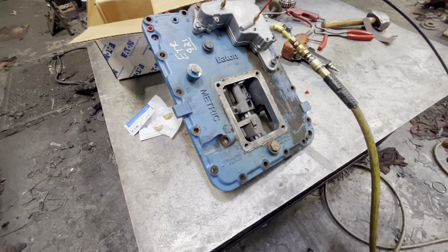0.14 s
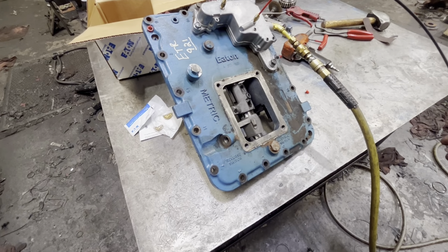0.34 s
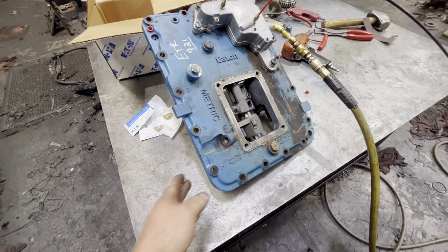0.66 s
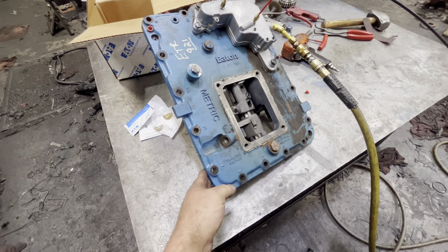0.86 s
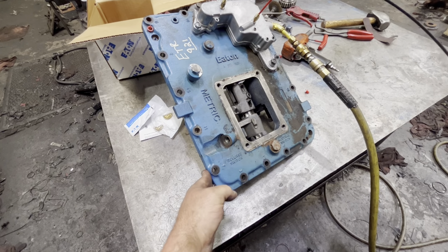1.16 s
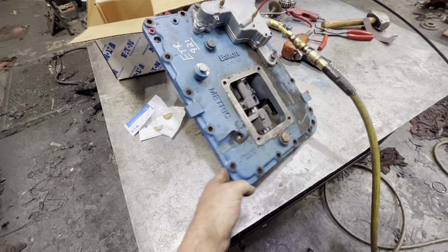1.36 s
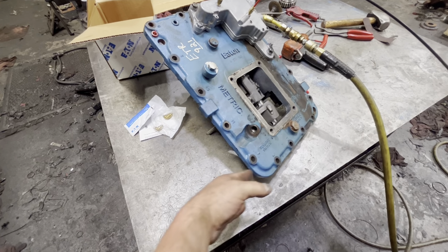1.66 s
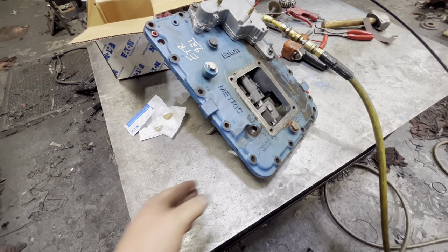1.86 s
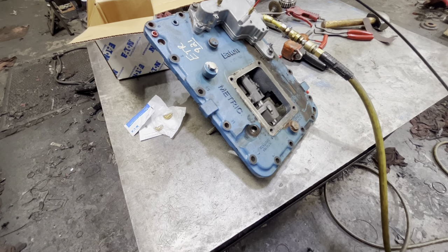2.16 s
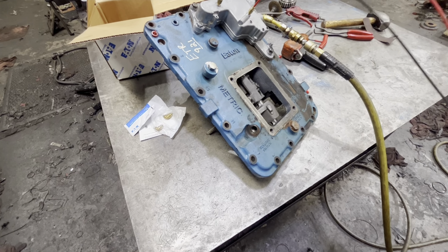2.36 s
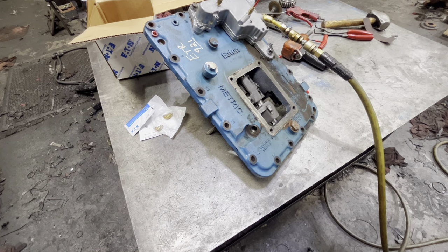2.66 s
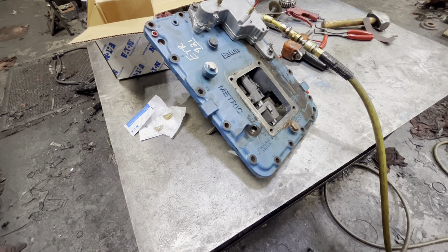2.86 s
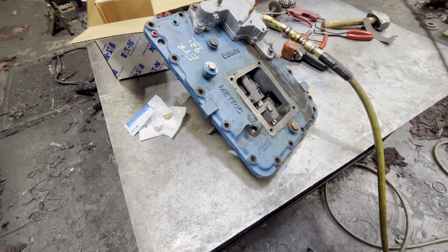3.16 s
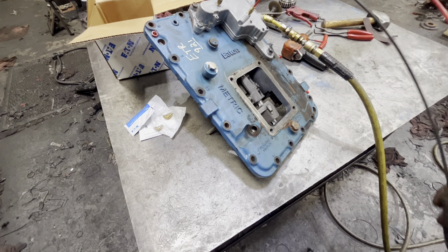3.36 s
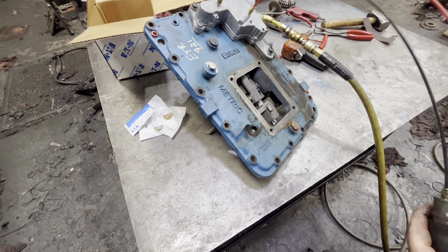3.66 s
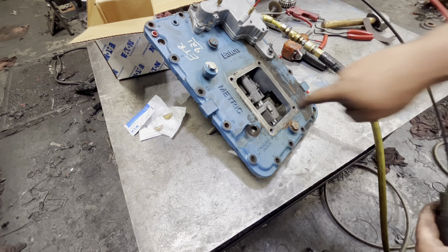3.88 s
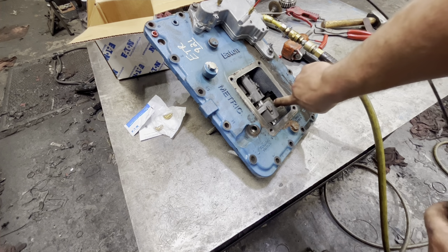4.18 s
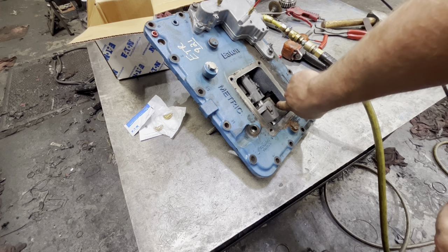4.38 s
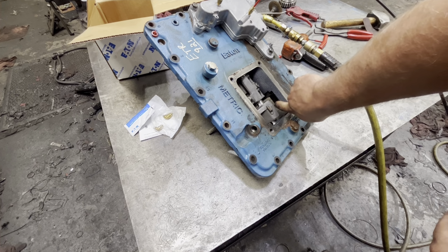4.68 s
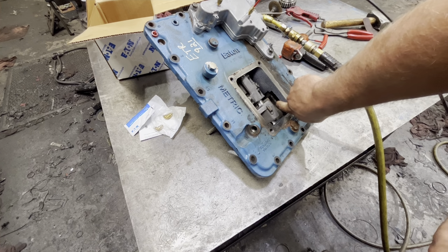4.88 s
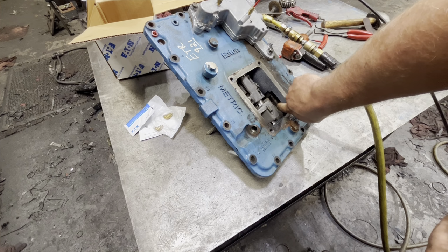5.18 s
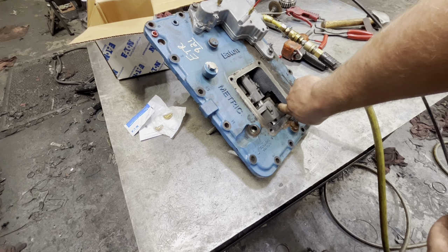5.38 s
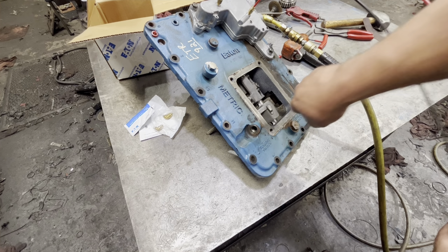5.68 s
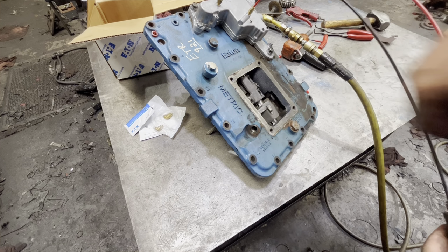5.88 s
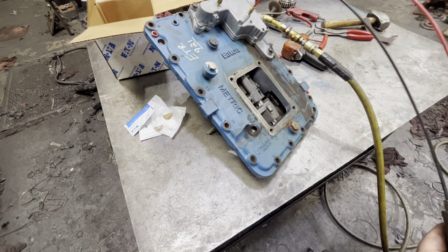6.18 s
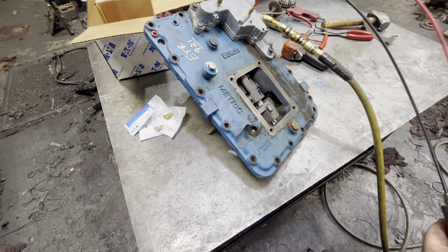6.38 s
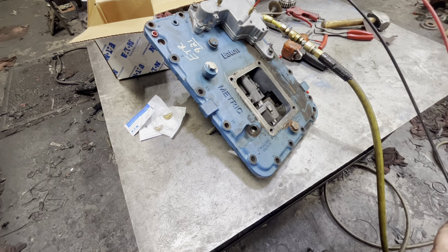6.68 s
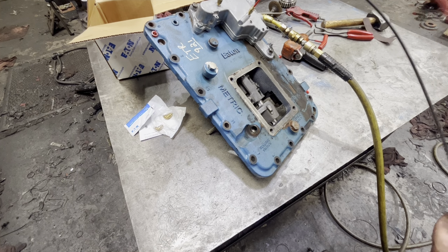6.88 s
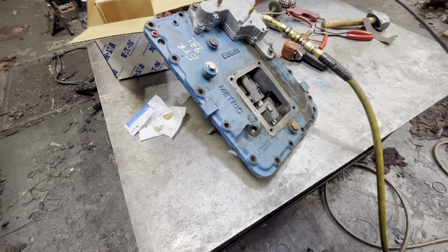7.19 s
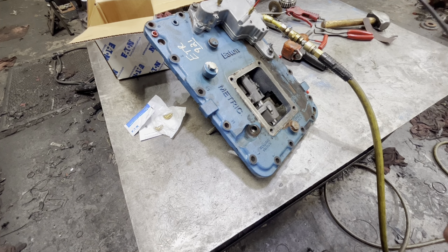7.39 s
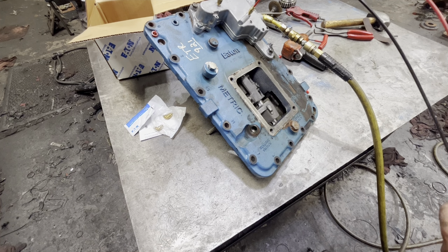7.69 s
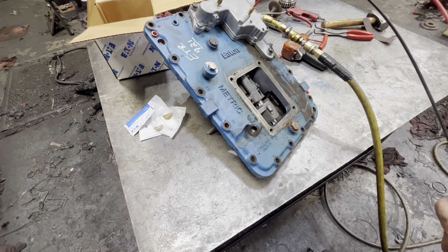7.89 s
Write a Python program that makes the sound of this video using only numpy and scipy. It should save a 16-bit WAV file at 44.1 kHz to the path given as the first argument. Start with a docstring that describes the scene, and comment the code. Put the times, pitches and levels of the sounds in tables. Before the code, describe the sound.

Compressed air hisses steadily from a metal casting on a bench; a dull scrape, small ticks, then five sharp air blasts ending in hard metallic clacks.

```python
"""An air-shifted transmission cover is tested on a workshop bench: low rumble and machine hum lie below all.
A leak, noise through cavity resonances, hisses throughout; a shove scrapes the cover round and turns it away.
The hand valve is picked up with damped ticks, and an arm reaches over the leak and throws its hiss back.
Five throws, out and back by turns: noise spits, blasts while the piston travels, and modes ring as it stops.
With the piston out, softer noise blows on until the next throw, after the last one to the end."""
import sys
import numpy as np
from scipy import signal
from scipy.io import wavfile
from scipy.ndimage import uniform_filter1d

SR = 44100
rng = np.random.default_rng(int(sys.argv[2]) if len(sys.argv) > 2 else 0)


def output_pcm(signal):
    """Save a mono or channel-first signal as 16-bit PCM at the path in sys.argv[1].

    Samples are clipped to [-1, 1] before scaling.
    """
    pcm = np.clip(np.atleast_2d(signal).T, -1, 1) * 32767
    wavfile.write(sys.argv[1], SR, np.round(pcm).astype(np.int16))


N = 354563
T = np.arange(N) / SR

# throws of the valve: (valve opens t/s, piston breaks free t/s, piston hits stop t/s, level/dB, direction)
THROWS = [(4.68, 4.7588, 4.9245, 0, "out"), (5.292, 5.3315, 5.4202, 0, "back"),
          (5.772, 5.844, 6.006, -0.2, "out"), (6.313, 6.3533, 6.4418, 0.25, "back"),
          (7.538, 7.5674, 7.7375, 0, "out")]
# lull between spit and blast, by direction: (duration/s)
LULL_S = {"out": .02, "back": .024}
# level difference of the two channels, left minus right: (f/Hz, level/dB)
CHANNEL_BALANCE = [(60, -0.5), (250, -7), (500, -1), (1400, -0.5), (2200, -6), (2850, -3), (3300, 1),
                   (4000, 5), (5300, 6), (5900, 4), (7400, -0.5), (9100, -11.5), (10000, -2.5),
                   (10800, -0.5)]
# the shove: fastest moment, speeding up, slowing down
SHOVE_S, SHOVE_RISE_S, SHOVE_FALL_S = 1.405, 0.075, 0.18


def amp(db):
    """Decibels to gain."""
    return 10 ** (np.asarray(db) / 20)


def unit(x):
    """Scales to rms 1."""
    return x / np.sqrt(np.mean(x ** 2) + 1e-20)


def read(points, hz):
    """Interpolates a table on a log-frequency axis."""
    f, value = np.transpose(points)
    return np.interp(np.log(hz + 1), np.log(f + 1), value)


def add(mix, start_s, sound):
    """Mixes a two-channel sound in at start_s."""
    part = mix[:, round(start_s * SR):][:, :sound.shape[1]]
    part += sound[:, :part.shape[1]]


def wander(t, max_hz):
    """Random slow drift of rms 1: 20 sines from max_hz / 20 to max_hz, slow ones strongest."""
    speeds_hz = max_hz * np.geomspace(1 / 20, 1, num=20)
    return unit(sum(np.sin(2 * np.pi * (f * t + rng.random())) / np.sqrt(f) for f in speeds_hz))


def gate(start_s, stop_s, rise_s, fall_s):
    """Flow builds up exponentially from start_s and dies away after stop_s."""
    build = -np.expm1(-np.maximum(T - start_s, 0) / rise_s)
    return build * np.exp(-np.maximum(T - stop_s, 0) / fall_s)


def jet(spectrum, cavities=(), ripple_db=-0.3, patchy_db=1.5):
    """Turbulent noise through cavity resonances and near reflections, in two channels; rms 1."""
    # correlation of left and right channels: (f/Hz, correlation 0-1)
    channel_correlation = [(100, 0.96), (270, 0.89), (500, 0.12), (900, 0.8), (3000, 0.4), (9000, 0.39),
                           (11500, 1), (15500, 0.46)]
    # phase by which the left channel leads the right: (f/Hz, phase/rad)
    channel_phase = [(250, 0), (900, .6), (1900, 2.1), (3300, 4.1), (5400, 4.6), (7000, 6.3), (8300, 9.2),
                     (9300, 10.2), (10300, 12.5), (13000, 12.5), (14700, 10)]
    size, hop = 1024, 256
    hz = np.fft.rfftfreq(size, 1 / SR)
    t = np.arange(N // hop + 5)[:, None] * hop / SR
    a, b, c, d, patches = rng.standard_normal((5, len(t), len(hz)))

    colour_db = read(spectrum, hz)
    for centre_hz, width_hz, db in cavities:
        # pitch and strength drift a little with the flow
        detune_hz = hz - centre_hz * (1 + 0.003 * wander(t, 1.5))
        peak_db = db + 0.6 * wander(t, 2)
        colour_db = colour_db + peak_db / (1 + (2 * detune_hz / width_hz) ** 2)
    patches = uniform_filter1d(patches, size=14, axis=0)
    patches = unit(uniform_filter1d(patches, size=8, axis=1))

    # echoes off casting and bench comb the hiss; the combs slide slowly
    delays_s = rng.uniform(0.002, 0.008, size=3)
    combs = sum(np.cos(2 * np.pi * hz * delay * (1 + 0.003 * wander(t, 0.7))) for delay in delays_s)
    ripple = ripple_db * combs * hz / (hz + 1500)

    same = np.clip(read(channel_correlation, hz), 0, 1)
    left = a + 1j * b
    right = same * left + np.sqrt(1 - same ** 2) * (c + 1j * d)
    right = right * np.exp(-1j * read(channel_phase, hz))
    lean = amp(read(CHANNEL_BALANCE, hz) / 2)
    z = np.array([left * lean, right / lean]) / np.hypot(lean, 1 / lean)
    z *= amp(colour_db + patchy_db * patches + ripple)
    noise = signal.istft(z, nperseg=size, noverlap=size - hop, time_axis=1, freq_axis=2)[1]
    return unit(noise[:, :N])


def blasts(held_db=-27, shudder_db=-25.5, flutter_db=1.0):
    """Air escapes while the piston travels, by one path out and another back; held out, it blows softly."""
    # air path, piston going out: (f/Hz, level/dB per Hz); cavities (f/Hz, width/Hz, level/dB)
    out_jet = [(500, -26), (1700, -23), (2000, -20), (6000, -11), (10000, -8), (14000, -13), (15600, -18)]
    out_cavities = [(930, 180, 6), (2170, 670, 14), (2920, 370, 6), (3440, 600, 13), (4670, 490, 5),
                    (5400, 400, 8), (5930, 660, 7), (6620, 370, 8), (9010, 470, 6), (9860, 360, 4),
                    (10330, 180, 4)]
    # air path, piston coming back: same columns
    back_jet = [(500, -22), (1700, -19), (3000, -17), (8000, -8), (11000, -9), (14500, -14), (15600, -13)]
    back_cavities = [(890, 140, 6), (2210, 160, 9), (3290, 800, 10), (4490, 120, 6), (5210, 540, 5),
                     (6660, 790, 6), (7400, 170, 8), (9770, 530, 6)]
    # cavities changed in the softer blowing: (f/Hz, width/Hz, level/dB)
    held_cavities = [(900, 300, -8), (3450, 400, -5), (5400, 500, -3), (9950, 200, 5), (12200, 1600, -3)]
    # crack of air let out by the freed piston: (f/Hz, level/dB per Hz)
    crack_jet = [(200, 0), (1500, -24), (2400, 1), (3600, 2.5), (6000, -3), (8500, -2), (15000, -19)]
    # blast and crack, by direction: (level/dB)
    blast_db = {"out": -16, "back": -17.5}
    crack_db = {"out": -13.3, "back": -12}
    out, held, back, crack = 0, 0, 0, 0
    next_throws_s = [row[0] for row in THROWS[1:]] + [N / SR]
    for (_, free_s, stop_s, db, way), shut_s in zip(THROWS, next_throws_s):
        crack = crack + amp(db + crack_db[way]) * gate(free_s, free_s + 0.0048, 0.0005, 0.0031)
        if way == "out":
            out = out + amp(db + blast_db[way]) * gate(free_s, stop_s, 0.00067, 0.013)
            held = held + amp(db + held_db) * gate(stop_s, shut_s, 0.025, 0.0074)
        else:
            back = back + amp(db + blast_db[way]) * gate(free_s, stop_s, 0.0012, 0.009)
    air = out * jet(out_jet, out_cavities, ripple_db=2.5)
    air = air + back * jet(back_jet, back_cavities, ripple_db=1.5)
    air = air + held * jet(out_jet, out_cavities + held_cavities, ripple_db=2.3)
    # the flow also shakes the casting
    shake = jet([(20, -28), (60, 22), (120, -2.5), (250, -4.5), (500, -19), (1500, -52)])
    shudder = (out + held + back) * amp(shudder_db) * shake
    return air * amp(flutter_db * wander(T, 120)) + crack * jet(crack_jet) + shudder


def spits(fizz_db=-16, rush_db=-18.5, max_fizz_s=0.026):
    """Air squeezes through the valve's narrow gap as a fizz, then a wider rush; slow throws build slowly."""
    # narrow gap, then wider gap: (f/Hz, level/dB per Hz)
    fizz_jet = [(1000, -40), (7000, -6.5), (8700, -6.5), (9800, 1), (12000, -0.5), (14000, 2), (15500, -4)]
    rush_jet = [(100, -9), (600, -21), (1500, -10), (3000, 0), (4200, 1), (6000, -0.5), (8000, 1.5),
                (11000, 1.5), (15500, -15)]
    # build-up and fall as shares of the spit's length
    fizz_build, rush_build, spit_fall = 0.035, 0.2, 0.27
    fizz, rush = 0, 0
    for opens_s, free_s, _, _, way in THROWS:
        length_s = max(free_s - opens_s - LULL_S[way], 0.002)
        fall_s = spit_fall * length_s
        fizz_end_s = opens_s + min(length_s, max_fizz_s)
        fizz = fizz + amp(fizz_db) * gate(opens_s, fizz_end_s, fizz_build * length_s, fall_s)
        rush = rush + amp(rush_db) * gate(opens_s, opens_s + length_s, rush_build * length_s, fall_s)
    return fizz * jet(fizz_jet, ripple_db=1.4) + rush * jet(rush_jet, ripple_db=1.4)


def blows():
    """Each throw strikes thrice: spool seats as the spit ends, piston breaks free, piston stops."""
    # the three blows in that order, by direction: (level/dB, brightness/dB per octave)
    blow_table = {"out": [(-29, -11.5), (-19.5, 1.5), (-1.3, -3)], "back": [(-25.5, -8), (-25, -2),
                  (3, -0.5)]}
    strikes = []
    for _, free_s, stop_s, db, way in THROWS:
        times_s = (free_s - LULL_S[way], free_s, stop_s)
        for time_s, (blow_db, bright_db) in zip(times_s, blow_table[way]):
            strikes.append((time_s, db + blow_db, bright_db))
    return strikes


def knocks(build_cycles=1.34, ring_db=-2.0):
    """Every blow rings the cover's modes in slightly different shares; low ones take longer to build up."""
    # modes of the cover on its bench: (f/Hz, level/dB, t60/s)
    cover = [(75.4, -41, 0.4), (109.3, -35, .2), (148, -34, 0.16), (181, -28, 0.15), (231, -22.5, 0.15),
             (255, -24, 0.12), (287, -33, .11), (415.7, -25.5, 0.14), (454, -23.5, 0.094),
             (505, -21.5, 0.08), (564, -22, 0.065), (655, -20, 0.038), (736, -18, 0.1), (860, -24, 0.085),
             (932, -16, 0.078), (1012, -19.5, 0.12), (1270, -19, 0.07), (1375, -17, 0.066),
             (1485, -19, 0.05), (1900, -26, 0.034), (2050, -21, 0.052), (2630, -24, 0.03)]
    t = np.arange(SR // 2) / SR
    out = np.zeros((2, N))
    hz, db, t60_s = np.transpose(cover)[:, :, None]
    # low modes nearly in step between the channels, high modes out of step
    spread = np.minimum(hz / 700, 1) * rng.standard_normal((2, len(hz), 1))
    phase = rng.uniform(0, 2 * np.pi, hz.shape) + spread
    lean_db = np.array([1, -1])[:, None, None] * read(CHANNEL_BALANCE, hz) / 2
    modes = amp(db + lean_db - 60 * t / t60_s) * np.sin(2 * np.pi * hz * t + phase)
    modes = modes * -np.expm1(-(t * hz / build_cycles) ** 2)
    for time_s, blow_db, bright_db in blows():
        share_db = 2 * rng.standard_normal(hz.shape)
        gain = amp(ring_db + blow_db + share_db + bright_db * np.log2(hz / 700))
        add(out, time_s, (modes * gain).sum(axis=1))
    return out


def clatter(impact_db=-13, rattle_db=-22.5, impact_fall_s=0.0035, rattle_fall_s=0.026):
    """Small modes of linkage and bench blur to noise: each blow is a hard impact, then a dying rattle."""
    # blurred modes: (f/Hz, level/dB per Hz)
    clatter_colour = [(80, -16), (235, -3), (340, -12), (520, -5), (900, 4.5), (1150, -6), (1380, -2),
                      (2100, -4), (3000, -18), (5000, -27), (12000, -50)]
    shake = 0
    for time_s, db, _ in blows():
        shake = shake + amp(db + impact_db) * gate(time_s, time_s + 0.0013, 0.0004, impact_fall_s)
        shake = shake + amp(db + rattle_db) * gate(time_s, time_s + 0.0053, 0.0062, rattle_fall_s)
    return shake * jet(clatter_colour)


def leak(flutter_db=0.6, swell_db=0.17, beam_power=2.2):
    """Steady jet, recoloured as the shove turns it, as an arm covers it and once the piston has worked."""
    # leak facing the listener: (f/Hz, level/dB per Hz); cavities (f/Hz, width/Hz, level/dB)
    facing_jet = [(500, -28), (1400, -25), (2500, -22), (2800, -11), (4600, -8.5), (8000, -11),
                  (12500, -16.5), (14200, -19), (15600, -41)]
    facing_cavities = [(875, 260, 16.3), (2005, 510, 10.8), (2780, 230, 2), (3330, 130, 4.4),
                       (6630, 360, 4.2), (7420, 280, 5.7), (8290, 230, 4.7), (9050, 270, 7.5),
                       (9550, 320, 14.4), (11420, 330, 9), (12150, 370, 8.4), (12900, 220, 7)]
    # leak turned away: same columns
    away_jet = [(500, -26), (1400, -22), (2500, -17.5), (2800, -9), (7500, -14), (11500, -11),
                (14200, -18.5), (15600, -41)]
    away_cavities = [(889, 285, 18.7), (1987, 254, 12.3), (2800, 320, 7.2), (3340, 240, 6.8),
                     (4310, 720, 4.3), (5310, 470, 10.7), (6530, 400, 13), (6900, 280, 10), (7390, 200, 13),
                     (8300, 460, 5.6), (9090, 290, 8.5), (9620, 250, 7.6), (10950, 410, 4.6)]
    # hollow under the arm: (f/Hz, width/Hz, level/dB)
    arm_cavities = [(2000, 150, 8), (3340, 200, 14), (5280, 250, 7), (6470, 200, 8)]
    # cavities changed once the piston has been worked: (f/Hz, width/Hz, level/dB)
    worked_cavities = [(2004, 170, 7.5), (2810, 210, -5), (3420, 150, 5), (7300, 120, 3.5),
                       (8050, 500, 3.5), (8880, 260, 7)]
    facing_db, facing_db_per_s = -34.5, 1.9  # grows until the shove
    away_db, arm_db, worked_db = -33, -40, -33
    reach_s, leave_s, worked_s = 3.36, 4.52, 5.45

    turned = np.cumsum(shove()) / shove().sum()
    away = np.clip(turned ** beam_power, 0, 1)
    worked = np.clip((T - worked_s) / 0.1, 0, 1)
    front_gain = np.sqrt(1 - away) * amp(facing_db + facing_db_per_s * np.minimum(T, SHOVE_S))
    away_gain = np.sqrt(away * (1 - worked)) * amp(away_db)
    arm_gain = gate(reach_s, leave_s, 0.12, 0.2) * amp(arm_db)
    worked_gain = np.sqrt(worked) * amp(worked_db)
    air = front_gain * jet(facing_jet, facing_cavities, ripple_db=-0.8, patchy_db=2.0)
    air = air + away_gain * jet(away_jet, away_cavities, ripple_db=2.1)
    air = air + arm_gain * jet(facing_jet, facing_cavities + arm_cavities, ripple_db=2.5)
    air = air + worked_gain * jet(away_jet, away_cavities + worked_cavities, ripple_db=1.8)

    # the passing hand shades the leak; picking up the hand valve makes it swell
    shade_db = -2.2 * np.exp(-((T - 4.12) / 0.063) ** 2)
    nudge_db = 2 * gate(3.31, 3.31 + 0.06, 0.015, 0.2)
    return air * amp(shade_db + nudge_db + flutter_db * wander(T, 40) + swell_db * wander(T, 4))


def shove():
    """Speed of the dragged cover, 0-1: it picks up quickly and slows down gently."""
    return np.exp(-((T - SHOVE_S) / np.where(T < SHOVE_S, SHOVE_RISE_S, SHOVE_FALL_S)) ** 2)


def drag(slips_per_s=600, ring_s=0.051, shove_db=-27.5):
    """The casting sticks and slips on the bench; each slip is a dying burst of dull noise, louder with speed."""
    # scrape on the bench: (f/Hz, level/dB per Hz)
    drag_colour = [(40, -30), (80, -3), (130, 0), (230, 1.5), (360, -5), (440, -1), (540, -20), (850, -10),
                   (1120, -19), (1450, -15), (2000, -23), (3000, -31)]
    slips = (rng.random(N) < slips_per_s / SR) * rng.standard_normal(N)
    # slip energies add up
    pressure = np.sqrt(signal.lfilter([1], [1, -np.exp(-2 / (ring_s * SR))], slips ** 2))
    return amp(shove_db) * shove() * unit(pressure * jet(drag_colour, patchy_db=2))


def clicks():
    """Damped modes of the valve's fittings tick as it is picked up, a little to the right."""
    # ticks: (t/s, level/dB, brightness/dB per octave)
    ticks = [(2.849, -22, -7), (3.3043, 3, 4), (3.3068, 1, 5), (3.4206, -16, -9), (3.424, -18, -8)]
    # modes of the fittings: (f/Hz, level/dB, t60/s)
    fittings = [(780, -23, .01), (1280, -24, .011), (1680, -19, .009), (2300, -21, .009), (2850, -27, .011),
                (3400, -35, .008)]
    t = np.arange(SR // 20) / SR
    out = np.zeros((2, N))
    hz, db, t60_s = np.transpose(fittings)[:, :, None]
    for time_s, click_db, bright_db in ticks:
        gain = amp(click_db + db + bright_db * np.log2(hz / 1500) - 60 * t / t60_s)
        ring = gain * np.sin(2 * np.pi * (hz * t + rng.random(hz.shape)))
        add(out, time_s, amp([[-1.5], [1.5]]) * ring.sum(axis=0) * -np.expm1(-t / 0.0004))
    return out


def workshop(rumble_db=-47.5):
    """Low rumble as shaped noise, and the hum of machines as sines of wavering phase."""
    # rumble: (f/Hz, level/dB per Hz)
    rumble = [(15, -40), (25, -19), (40, 5.5), (80, 1.5), (105, -5.5), (160, -14), (250, -15.5),
              (400, -22.5), (800, -45.5), (3000, -54)]
    # machine hum, before the lean to the right: (f/Hz, rms level/dB)
    machine_hum = [(80, -56), (121, -62), (188, -67.5), (220, -68.5), (252, -63.5)]
    hum = 0
    for hz, db in machine_hum:
        hum = hum + amp(db) * np.sqrt(2) * np.sin(2 * np.pi * hz * T + 0.61 * wander(T, 3))
    return amp(rumble_db) * jet(rumble, patchy_db=0.5) + amp([[-2], [2]]) * hum


def room(x):
    """Diffuse noise tail that builds up in a few milliseconds and decays by frequency, top treble first."""
    # room decay: (f/Hz, t60/s)
    decay = [(100, 0.5), (500, 0.32), (1200, 0.48), (3000, 0.55), (8000, 0.35), (15000, 0.06)]
    hz, t, z = signal.stft(rng.standard_normal((2, SR)), SR, nperseg=256)
    z *= amp(-60 * t / read(decay, hz)[:, None]) * -np.expm1(-t / 0.0042)
    tail = signal.istft(z, SR, nperseg=256)[1]
    return signal.fftconvolve(x, tail / np.linalg.norm(tail[0]), axes=1)[:, :N]


def scene():
    """All sources, direct; the ringing metal feeds the room more than the beamed air jets do."""
    air = spits() + blasts()
    metal = knocks() + clatter() + clicks()
    reverb = room(amp(-13.5) * air + amp(-12) * metal)
    return leak() + air + metal + drag() + workshop() + reverb


def record(dry, low_cut_hz=36, edge_hz=15650):
    """The microphone's bass roll-off and a steep band limit at edge_hz."""
    bass_cut = signal.butter(4, low_cut_hz, "highpass", fs=SR, output="sos")
    band_limit = signal.firwin(511, edge_hz, window=("kaiser", 9), fs=SR)
    return signal.oaconvolve(signal.sosfilt(bass_cut, dry), band_limit[None], "same", axes=1)


dry = scene()
out = record(dry)
output_pcm(out)
```